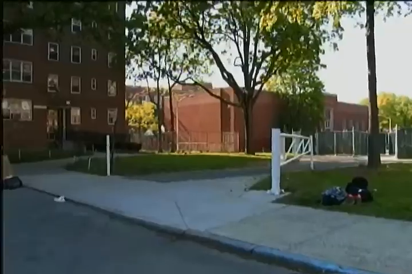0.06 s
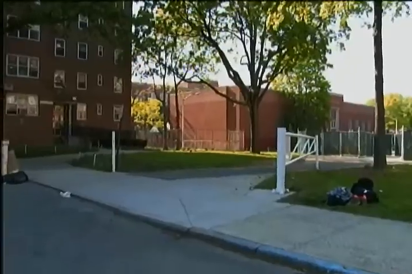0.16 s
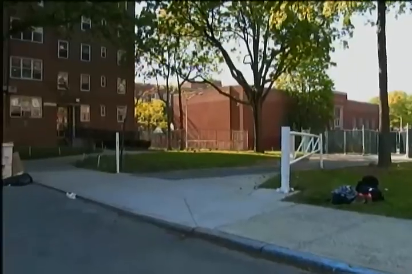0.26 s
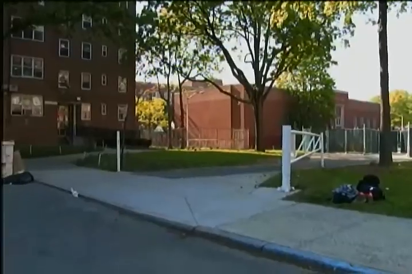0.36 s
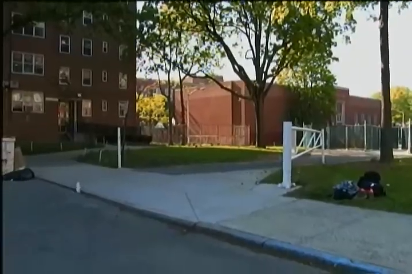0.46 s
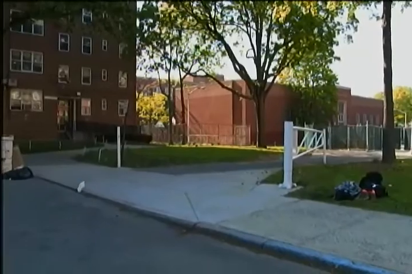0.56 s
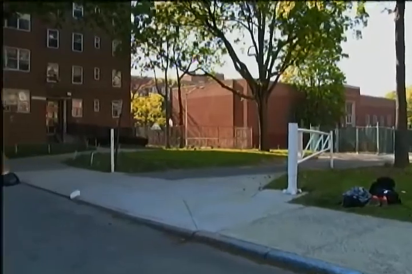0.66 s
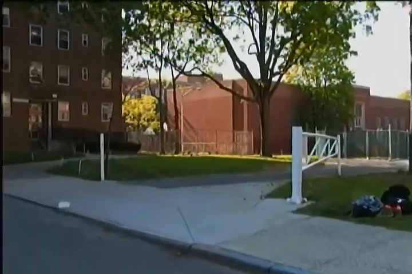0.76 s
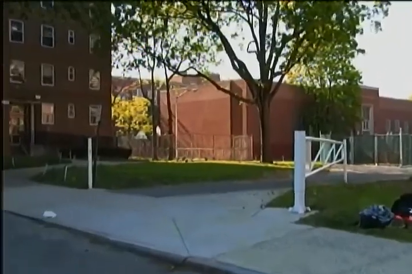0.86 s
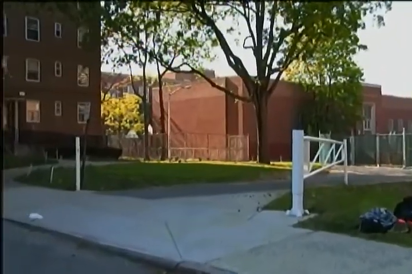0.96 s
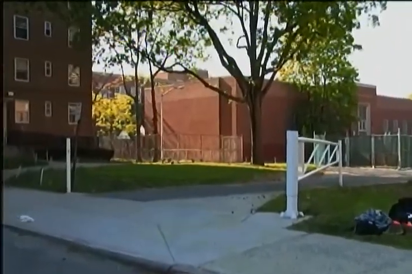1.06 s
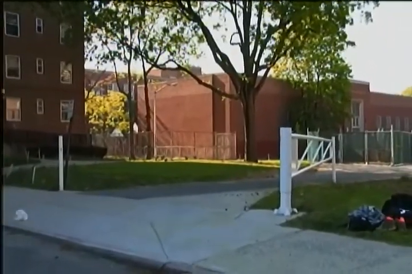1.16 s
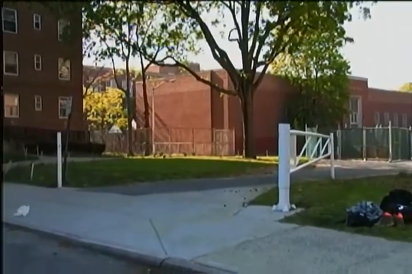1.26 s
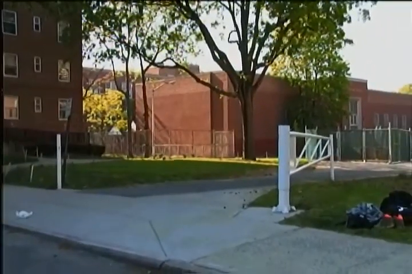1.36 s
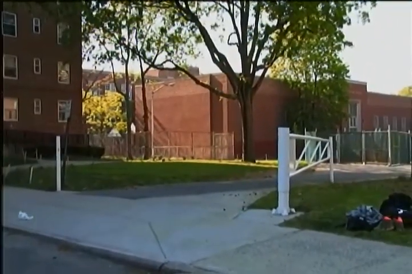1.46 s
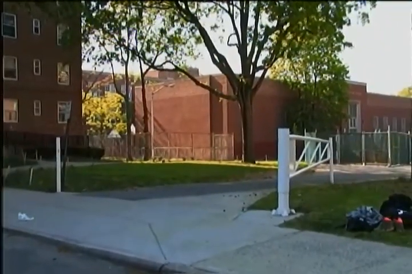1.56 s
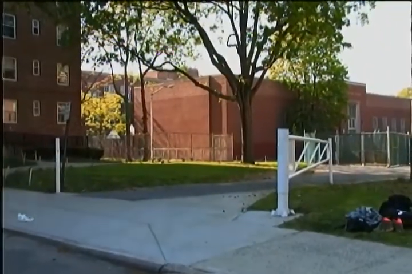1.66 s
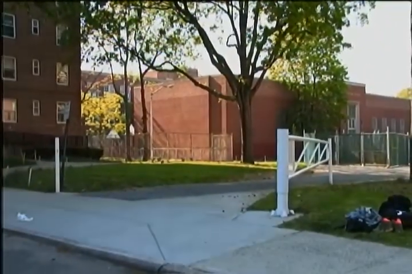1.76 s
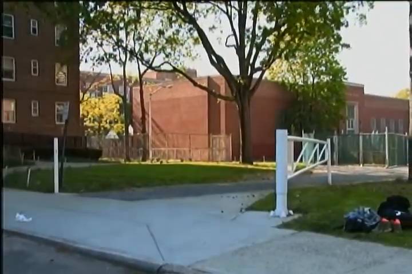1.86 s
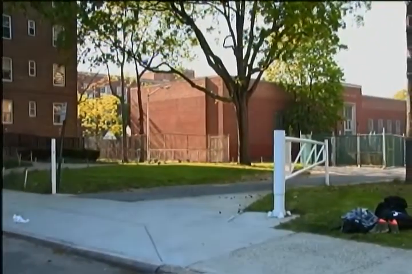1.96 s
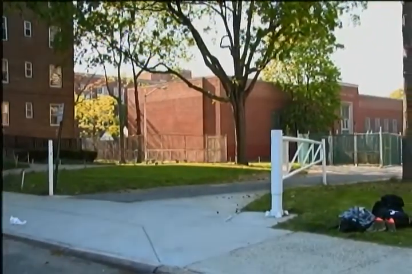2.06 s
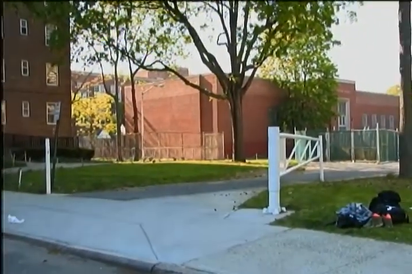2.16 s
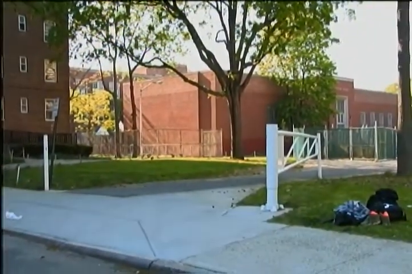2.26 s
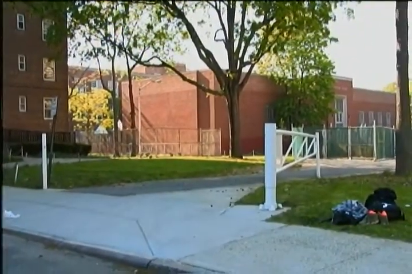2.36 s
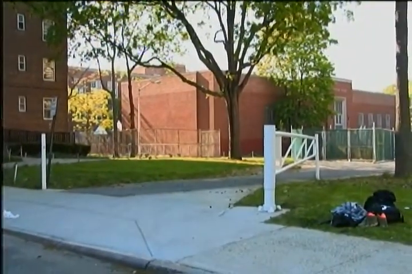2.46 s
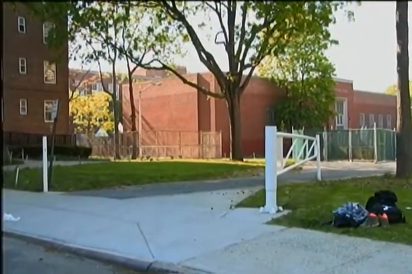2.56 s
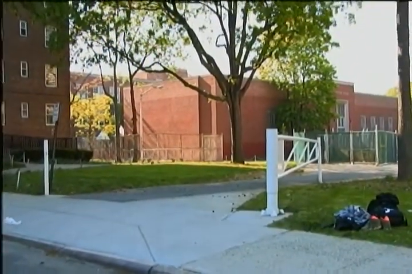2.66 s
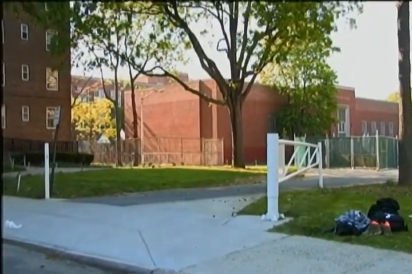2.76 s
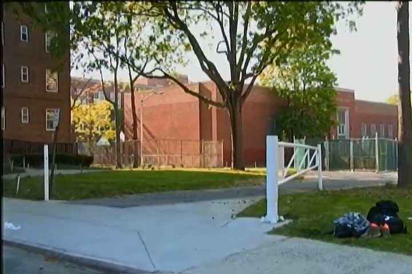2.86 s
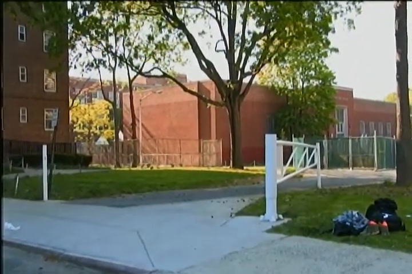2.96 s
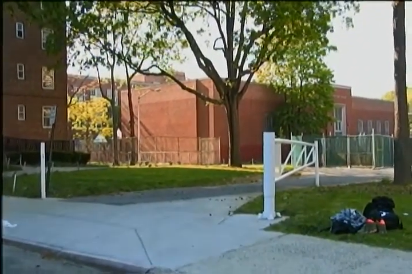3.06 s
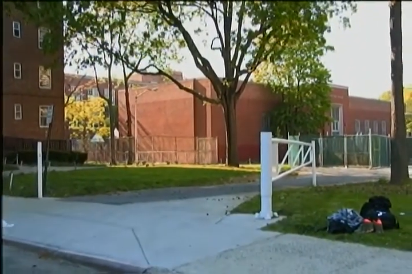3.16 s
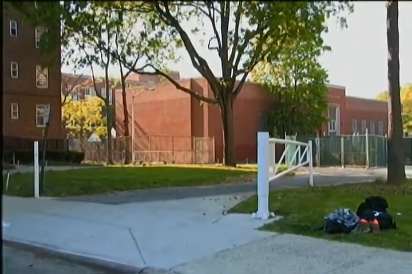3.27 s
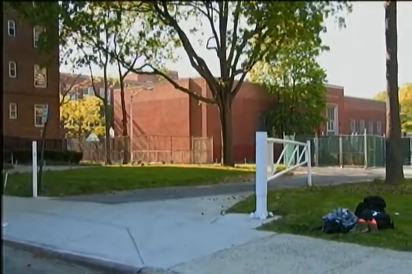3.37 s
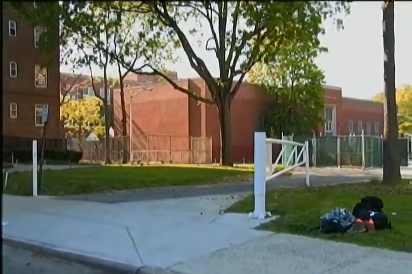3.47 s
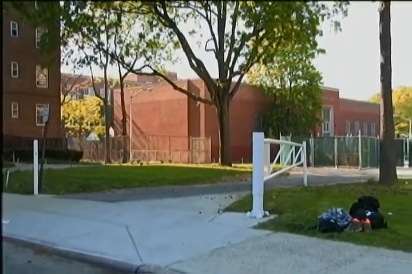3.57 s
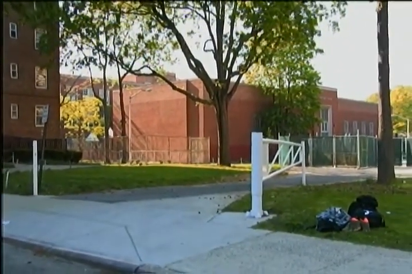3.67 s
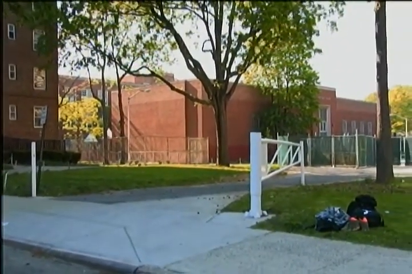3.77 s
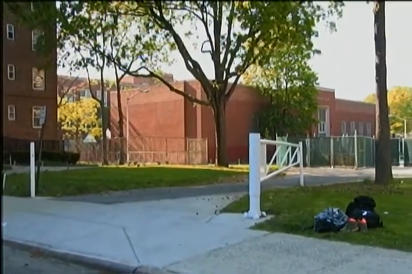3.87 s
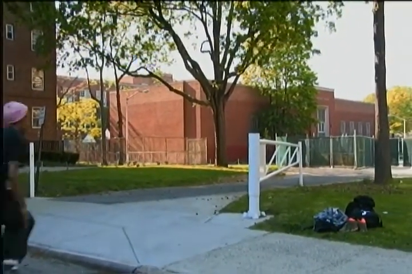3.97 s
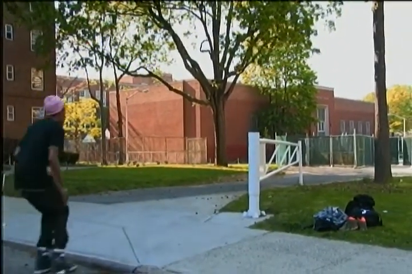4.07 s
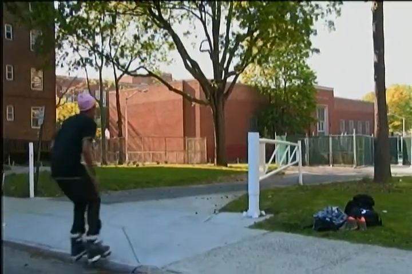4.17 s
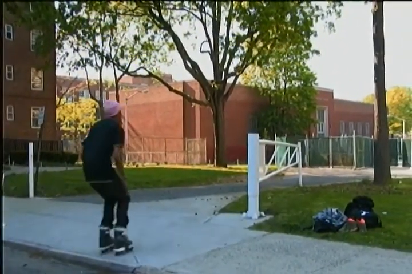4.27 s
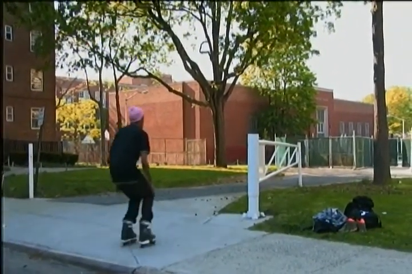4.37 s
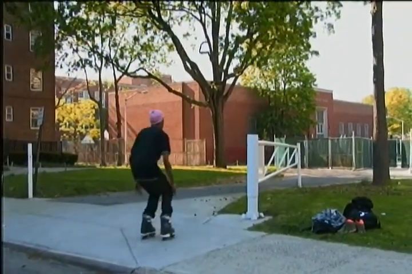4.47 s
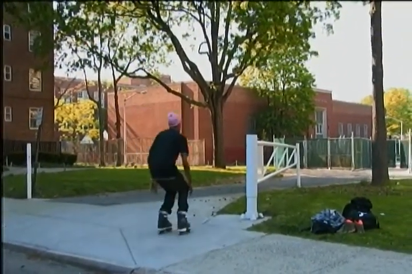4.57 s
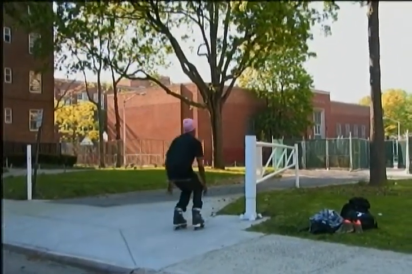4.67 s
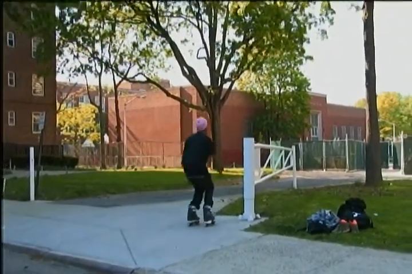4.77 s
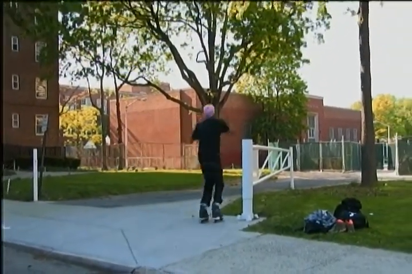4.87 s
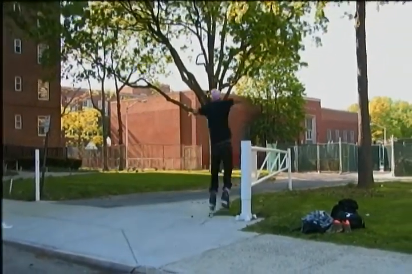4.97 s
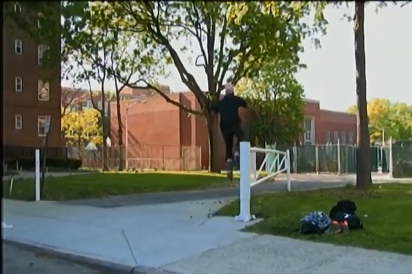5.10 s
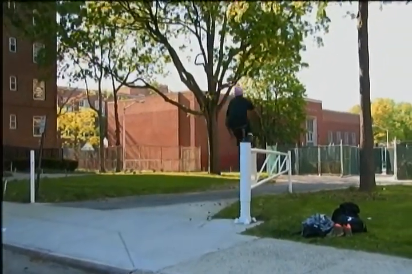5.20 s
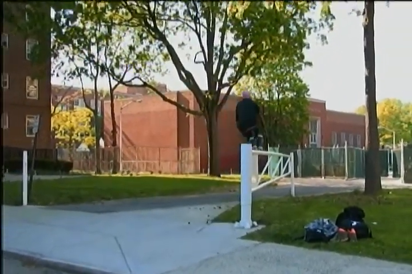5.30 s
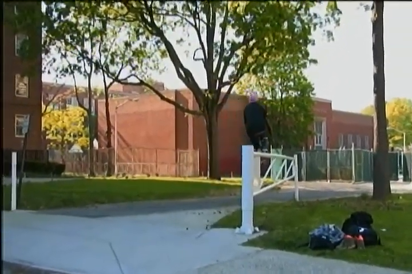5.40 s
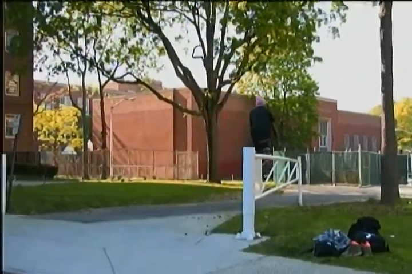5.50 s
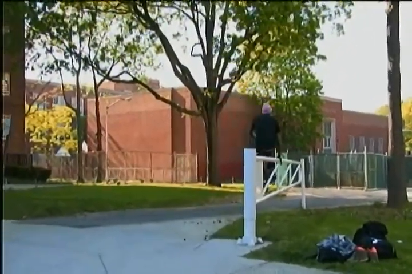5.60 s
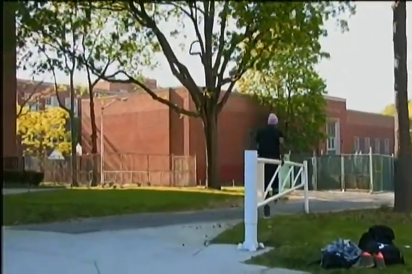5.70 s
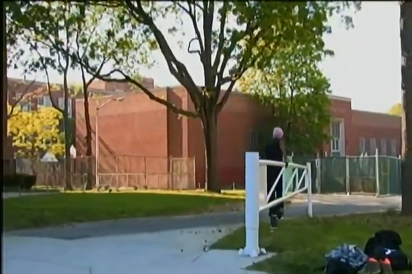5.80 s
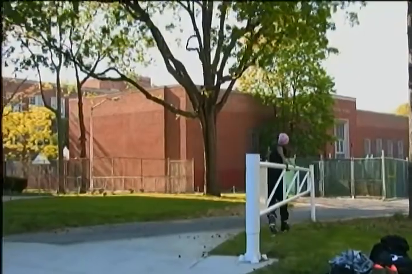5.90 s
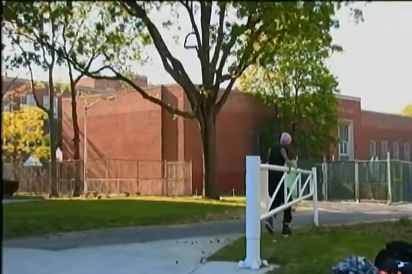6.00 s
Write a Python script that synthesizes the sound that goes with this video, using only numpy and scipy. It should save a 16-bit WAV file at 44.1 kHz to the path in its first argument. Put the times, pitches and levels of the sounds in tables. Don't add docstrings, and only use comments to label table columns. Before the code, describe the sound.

Outdoors, low distant traffic rumbles under light wind, with a gust thumping the microphone near 0.8 s. From the left, faint skate wheels clatter over stones, with sharp knocks around 0.6-1.4 s and a sparser lull until 2.2 s. Then the rolling swells quickly into a loud, coarse roar by 2.5 s, lumpy and gritty, with stones knocking and bright sand cracking, densest around 3.1-3.4 s, as it swings towards the centre. At about 4.07 s the roar cuts off: a hop onto smooth slabs, lighter rolling and crisp joint knocks from 4.2 to 4.8 s. Only tiny ticks remain through the leap around 5.0-5.2 s. At 5.24 s frames strike the steel gate, scraping and ringing hollowly; from 5.5 s the landing shakes it with clangs and another gust. The ringing settles as wheels touch down at 5.85 s and roll off, ending with a tiny high squeak at 6.03 s.

```python
import sys
import numpy as np
from scipy import signal
from scipy.fft import rfft, irfft, next_fast_len
from scipy.io import wavfile
from scipy.ndimage import map_coordinates

SR = 44100
rng = np.random.default_rng(int(sys.argv[2]) if len(sys.argv) > 2 else 0)


def gain_from_decibels(decibels):
    exponent = np.asarray(decibels, float) / 20
    return 10 ** exponent


def transcribe(u):
    v = np.clip(np.atleast_2d(u).T, -1, 1)
    q = np.round(v * 32767).astype(np.int16)
    wavfile.write(sys.argv[1], SR, q)


N = 266348
SIZE = next_fast_len(N + 8192)
TIME_S = np.arange(N) / SR


def rms_one(x):
    return x / np.sqrt(np.mean(x ** 2) + 1e-20)


def column(values):
    return np.reshape(values, (-1, 1))


def in_time(*tables):
    s, *curves = np.concatenate(tables).T
    return np.array([np.interp(TIME_S, s, curve) for curve in curves])


def at_hz(points):
    hz, value = np.transpose(points)
    grid_hz = np.maximum(np.fft.rfftfreq(SIZE, 1 / SR), 1)
    return np.interp(np.log(grid_hz), np.log(hz), value)


def bell(s, half_s):
    return np.exp(-((TIME_S - s) / half_s) ** 2)


def filtered(x, order, hz, kind):
    return signal.sosfilt(signal.butter(order, hz, kind, fs=SR, output="sos"), x)


def filtered_in_phase(x, order, hz, kind):
    return signal.sosfiltfilt(signal.butter(order, hz, kind, fs=SR, output="sos"), x)


# (frequency [Hz], width [Hz], boost [dB])
HOUSING = [(580, 166, 3), (1200, 440, 4), (2302, 320, 5), (3990, 2440, 7), (6030, 640, -3.5),
           (6690, 2200, 6), (8860, 910, 4.5), (11760, 230, -9)]


def colour(x, spectrum):
    hz = np.fft.rfftfreq(SIZE, 1 / SR)
    housing_db = sum(boost / (1 + (2 * (hz - centre) / width) ** 2) for centre, width, boost in HOUSING)
    cepstrum = irfft(np.log(gain_from_decibels(at_hz(spectrum) + housing_db)), SIZE)
    cepstrum[1:SIZE // 2] *= 2
    cepstrum[SIZE // 2 + 1:] = 0
    return irfft(rfft(x, SIZE) * np.exp(rfft(cepstrum)), SIZE)[..., :N]


def split(x, edges_hz, spectrum):
    coloured = np.broadcast_to(colour(x, spectrum), (len(edges_hz) - 1, N))
    impulse = colour(np.eye(1, N)[0], spectrum)[:8192]
    bands = []
    for k, band in enumerate(coloured):
        edges = edges_hz[k:k + 2]
        gain = np.linalg.norm(filtered(impulse, 3, edges, "band"))
        bands.append(filtered(band, 3, edges, "band") / gain)
    return np.array(bands)


def drift(rate_hz):
    r = np.exp(-40 * np.pi * rate_hz / SR)
    slow = signal.lfilter([1], [1, -2 * r, r * r], rng.standard_normal(N // 20 + 2002))[2000:]
    return np.interp(np.arange(N) / 20, np.arange(len(slow)), rms_one(slow))


def grains(per_s, spread_db):
    sizes = gain_from_decibels(spread_db * np.minimum(rng.exponential(1, N), 3.6)) * rng.choice([-1, 1], N)
    return rms_one(sizes * (rng.random(N) < per_s / SR))


# (time [s], roll level [dB], loose sand [dB])
ROLL_STREET = [(0, -104, 2), (.4, -72.5, -25), (.67, -61.5, 11), (.82, -55.5, 0), (1.13, -57, -4),
               (1.41, -63, 11), (1.61, -59.5, 7), (1.83, -63, -8), (2.22, -50, -55), (2.28, -48.5, -41),
               (2.46, -42.5, -3), (2.884, -44.5, 4), (3.128, -43.5, 7), (3.33, -40, 12), (3.562, -41.5, -2),
               (3.75, -45, 2), (3.92, -44.5, 6), (4.062, -41.5, 8)]
# (time [s], roll level [dB], loose sand [dB])
ROLL_WALK = [(4.075, -77, 22), (4.273, -68, -32), (4.395, -58, -8), (4.525, -66, 6), (4.65, -58.5, 5),
             (4.781, -60, 4.5), (4.887, -65.5, -4), (5.051, -84.5, 18), (5.23, -93, 5)]
# (time [s], roll level [dB], loose sand [dB])
ROLL_AWAY = [
    (5.85, -61.5, 6),
    (5.926, -69, 14),
    (6.04, -64.5, -5),
]
STREET_LAYERS_DB = (5.5, -1.5, -6, -23.5)
WALK_LAYERS_DB = (1.5, 0, -6, -12.5)
AWAY_LAYERS_DB = (14, 2.5, -25, -11.5)
# (time [s], roar lost [dB], half length [s])
LIFTS = [
    (2.246, 0, .015),
    (2.99, 5.5, 0.031),
    (3.638, 4.5, 0.028),
    (3.792, -1.5, 0.015),
    (3.897, 1.5, 0.026),
]


def roll_layers():
    rumble_follows, grit_takes_sand, dull_db_per_sample = 0.77, 0.062, 1.3
    level, loose = in_time(ROLL_STREET, ROLL_WALK, ROLL_AWAY)
    level = level - sum(db * bell(s, half_s) for s, db, half_s in LIFTS)
    dull = dull_db_per_sample * in_time(PATH)[1]
    rumble = rumble_follows * (level + 44.5) - 45.0
    grit = level + grit_takes_sand * loose - dull
    fine = level + loose - dull
    surface = np.searchsorted([ROLL_WALK[0][0], ROLL_WALK[-1][0]], TIME_S)
    layers_db = np.transpose([STREET_LAYERS_DB, WALK_LAYERS_DB, AWAY_LAYERS_DB])
    return [rumble, level, grit, fine] + layers_db[:, surface]


# (time [s], frequency [Hz])
GROUND = [
    (1.5, 534),
    (2.5, 478),
    (2.9, 393),
    (3.15, 320),
    (3.5, 294),
    (4.1, 225),
]


def ground_echo(x):
    dull = filtered_in_phase(x, 2, 1700, "low")
    delay = SR / 2 / in_time(GROUND)[0]
    return x - 0.37 * map_coordinates(dull, [np.arange(N) - delay], order=1)


# (frequency [Hz], density [dB/Hz])
WHEELS = [(35, -58), (60, -6.5), (286, 0), (985, -14), (1720, -13), (2230, -10.5), (2950, -23.5),
          (4090, -18), (5800, -24), (6670, -25), (10600, -21), (11900, -25), (15800, -36)]
EDGES_HZ = (50, 900, 3000, 8000, 19000)


def wheels():
    level = gain_from_decibels(roll_layers() + column([.3, 1.0, .1, .1]))
    lumps = drift(33.0)
    unsteady = [gain_from_decibels(1.26 * lumps + 0.49 * drift(66)) for _ in range(4)]
    smooth = rng.standard_normal((4, N)) * unsteady
    grit = np.array([grains(per_s, 3.4) * gain_from_decibels(2.5 * lumps) for per_s in (400, 600, 600, 350)])
    grit_share = column([.1, .35, .6, .8])
    shake = np.sqrt(1 - grit_share) * rms_one(smooth) + np.sqrt(grit_share) * rms_one(grit)
    rumble, whirr, coarse, fine = level * split(shake, EDGES_HZ, WHEELS)
    return ground_echo(rumble + whirr) + coarse + fine


# (time [s], extra above 12 kHz [dB])
GRIT_FINENESS = [
    (.5, 1.5),
    (1.1, 6),
    (2.4, 7),
    (2.75, -10),
    (3.3, -15),
    (3.45, 21),
    (3.7, 12),
    (4.0, 0),
    (4.5, -5),
]


def fine_grit(x):
    finest = filtered_in_phase(x, 4, 12000, "high")
    return x + finest * (gain_from_decibels(in_time(GRIT_FINENESS)[0]) - 1)


def air():
    hiss = filtered(rng.standard_normal((2, N)), 4, 11500, "high")
    return gain_from_decibels(roll_layers()[1] - 25) * rms_one(hiss)


# (time [s], strength [dB], weight [dB], hardness [dB])
KNOCKS_FAR = [(0.078, -42.5, 4.5, -8), (0.328, -43, 6, -13), (0.374, -42, 1, -13), (0.6366, -34.5, 8.5, -8),
              (0.6744, -27.5, -4, -13), (0.7185, -42.5, 7, -7), (0.7858, -34.5, 3.5, -16),
              (0.804, -33, -7, -27), (0.895, -39, -1, -26), (0.948, -35, 5, -13), (1.016, -47, 15, -8),
              (1.069, -29, 0.5, -9.5), (1.0846, -33, -7, -14), (1.1217, -29.5, -1, -4.5),
              (1.178, -49, -13, 2.5), (1.294, -40, -4, -27), (1.329, -36.5, 4.5, -8), (1.347, -36, -2, -17),
              (1.379, -31, 3.5, -2.5), (1.521, -41, 5.5, -7), (1.528, -40, 7, -5.5),
              (1.792, -39.5, 0.5, -10), (1.801, -41, 2, -11), (1.8222, -38.5, 5.5, -9),
              (1.8401, -35, -1, -12), (1.918, -40.5, 2, -26), (2.127, -40.5, 8, -24),
              (2.2776, -29.5, 0, -8), (2.3127, -30.5, -4, -8)]
# (time [s], strength [dB], weight [dB], sharpness [dB])
KNOCKS_NEAR = [(2.739, -39, 5, -1.5), (2.795, -34.5, -1, -17), (2.818, -31, 10, -14),
               (2.8606, -34.5, 15, -19), (2.918, -34, -10, -12), (3.061, -39.5, 23, -6),
               (3.1, -40, 17, -13), (3.186, -39, -1, 3), (3.205, -33, 7, -18), (3.257, -45, 17, 0),
               (3.284, -35, -8, -4), (3.291, -49, 25, 5), (3.309, -51, 26, -8), (3.3496, -46, 14, 3),
               (3.379, -32, 12, -29), (3.4664, -42.5, 28, 9.5), (3.671, -34, 8, -15),
               (3.6964, -31.5, 8, -26), (3.7565, -33, 10, -17), (3.834, -38, 2, -20),
               (3.8414, -32.5, 11, -29), (3.852, -39, 0, -20), (3.908, -39, 0, -15), (3.93, -42, 24.5, -17),
               (3.9543, -26, -14, -32), (3.9924, -45, 35, -12), (4.0054, -27.5, -4, -17),
               (4.0333, -26, 5, 1), (4.042, -33.5, 13, -11), (4.055, -55, 26, -10)]
# (time [s], strength [dB], weight [dB], hardness [dB])
KNOCKS_WALK = [(4.2055, -42, 0, 1), (4.2082, -29, 3.5, 0), (4.2325, -28.5, 4.5, -2),
               (4.2408, -42.5, 16.5, 4), (4.2464, -41, -2, 9), (4.2636, -33.5, -4, 3), (4.288, -56, 0, 4),
               (4.296, -58, 0, 8), (4.312, -57, 0, 3), (4.3244, -35.5, 1.5, 0), (4.333, -36.5, 5.5, -2),
               (4.3921, -31.5, -9, -0.5), (4.407, -54, 5, -9), (4.459, -44, -3, -1),
               (4.4675, -32.5, -1, -3), (4.486, -31, -3, -4), (4.498, -48.5, 16, -5),
               (4.5246, -32, 2.5, -2.5), (4.55, -30, -5.5, -2), (4.639, -48, -12, 2),
               (4.708, -31.5, 0.5, -5.5), (4.744, -47, -5, 2.5), (4.782, -26.5, -9, -5.5)]
# (time [s], strength [dB], weight [dB], hardness [dB])
STRIKES = [(5.241, -28, -1, 4), (5.257, -42, 11, 14), (5.268, -30, 2, -6), (5.335, -31, 3, -13),
           (5.354, -42, 3, 2), (5.431, -41, -6, 4), (5.501, -46, 2, 13), (5.5057, -40, 12, 16.5),
           (5.5142, -31, -1, 4), (5.525, -34, 3, 7), (5.547, -33, 2, 5), (5.564, -33, 7, -8),
           (5.7438, -30.5, 5.5, -15), (5.787, -55, 2, 12), (5.822, -46, -11, -18), (5.864, -33.5, -4, -14),
           (5.947, -40.5, 3, -20)]
# (time [s], strength [dB], weight [dB], hardness [dB])
TICKS = [
    (4.841, -60, -6, 8),
    (4.8801, -66, 2, 6),
    (4.9869, -70, -2, 9),
    (5.0394, -66, 0, 10),
    (5.0927, -75, -4, 3),
    (5.1131, -69, 0, 8),
    (5.1396, -70, -3, 8),
    (5.177, -81, 0, 6),
    (5.2024, -73, 0, 6),
]
# (frequency [Hz], density [dB/Hz])
KNOCK_COLOUR = [(41, -37), (70, 0), (261, 5.5), (1430, -15.5), (2200, -11.5), (2580, -19.5), (4340, -18),
                (5570, -25), (6830, -23), (11000, -26.5), (12500, -31), (15800, -36)]
KNOCK_DECAY_S = (.006, .0017, .0008, .0005)
SNAP_DB = (17.3, 12.5, 7.4, 1.8)


def knocks():
    tick_db, tick_follows_hardness, knock_takes_weight = -8, 1.44, 0.31
    near_parts_db = column([-9, -2, -1, 1])
    shudder_db, shudder_s = column([-20.5, -22.5, -34.5, -42]), 0.04

    s, db, weight, hard = np.transpose(KNOCKS_FAR + KNOCKS_WALK + STRIKES + TICKS)
    parts_db = [db + weight, db, db + hard, db + tick_db + tick_follows_hardness * hard]
    near_s, db, weight, sharp = np.transpose(KNOCKS_NEAR)
    near_db = np.array([db + weight, db + 4 + knock_takes_weight * weight, db, db + sharp]) + near_parts_db

    clicks = np.zeros((4, N))
    at = np.round(np.r_[s, near_s] * SR).astype(int) - 50
    clicks[:, at] = gain_from_decibels(np.c_[parts_db, near_db] + column([-5, -3, 2, 2]))

    swell = np.exp(-1 / (.0012 * SR))
    puffs = []
    for click, decay_s in zip(clicks, KNOCK_DECAY_S):
        poles = np.poly([swell, swell, np.exp(-1 / (decay_s * SR))])
        puffs.append(signal.lfilter([(1 - swell) ** 2], poles, click + 1e-18))
    poles = np.poly([swell, np.exp(-1 / (shudder_s * SR))])
    shudder = gain_from_decibels(shudder_db) * signal.lfilter([1 - swell], poles, clicks + 1e-18)
    snaps = gain_from_decibels(column(SNAP_DB)) * np.roll(clicks, shift=70, axis=1)
    noise = (puffs + shudder) * rng.choice([-1, 1], (4, N))
    return split(noise - snaps, EDGES_HZ, KNOCK_COLOUR).sum(axis=0)


# (time [s], peak [dB])
SAND = [(2.3128, -56), (2.5298, -52), (2.5707, -46), (2.5977, -52), (2.6645, -51), (2.7363, -43),
        (2.7543, -49), (2.7757, -51), (2.7952, -49), (2.8172, -45), (2.8635, -47), (2.9183, -42),
        (3.0322, -48), (3.0601, -49), (3.087, -51), (3.099, -47), (3.1414, -45), (3.1599, -40),
        (3.1858, -44), (3.205, -38), (3.2357, -46), (3.2572, -38), (3.2691, -36), (3.2906, -37),
        (3.333, -33), (3.3499, -38), (3.4632, -51), (3.4657, -44), (3.4921, -41), (3.6602, -46),
        (3.6697, -46), (3.67, -41), (3.6872, -46), (3.7246, -48), (3.7595, -47), (3.8314, -46),
        (3.8967, -51), (3.8967, -45), (3.9396, -56), (3.9396, -41), (3.992, -48), (3.992, -38),
        (4.0035, -38), (4.0319, -32),
        (3.0868, -53), (3.0993, -50), (3.1098, -50), (3.1432, -47), (3.1487, -47), (3.1601, -46),
              (3.1856, -44), (3.1926, -45), (3.204, -44), (3.236, -50), (3.24, -49), (3.2574, -39),
              (3.2694, -41), (3.2749, -42), (3.2909, -35), (3.3078, -43), (3.3328, -57), (3.3328, -39),
              (3.3497, -39), (3.4011, -45)]


def sand():
    decay_s = 0.00047
    s, db = np.transpose(SAND)
    clicks = np.zeros(N)
    clicks[np.round(s * SR).astype(int)] = gain_from_decibels(db + 6.5)
    puffs = signal.lfilter([1], [1, -np.exp(-1 / (decay_s * SR))], clicks + 1e-18)
    return filtered(puffs * rng.choice([-1, 1], N), 3, (7500, 11400), "band")


# (time [s], force [dB], bite [dB])
SLIDE = [
    (5.228, -74, -19),
    (5.232, -61, 2),
    (5.239, -28, 4.5),
    (5.276, -24.5, 1.5),
    (5.286, -29.5, 2),
    (5.348, -28.5, -1),
    (5.358, -30.5, 4),
    (5.42, -34, -0.5),
    (5.49, -32.5, -3),
]
# (time [s], force [dB], bite [dB])
LANDING = [
    (5.499, -34, -1),
    (5.509, -30, 7),
    (5.543, -33, 8),
    (5.565, -26.5, 2.5),
    (5.676, -35, 0.5),
    (5.753, -35.5, -1.5),
    (5.861, -42, -0.5),
    (5.921, -49.5, 1.5),
    (6.04, -48, -10.5),
]


def grind_layers():
    boom_lag_s = 0.086
    force, bite = in_time(SLIDE, LANDING)
    keep = np.exp(-1 / (boom_lag_s * SR))
    boom = gain_from_decibels(-5) * np.sqrt(signal.lfilter([1 - keep], [1, -keep], gain_from_decibels(2 * force)))
    return np.array([boom, gain_from_decibels(force), gain_from_decibels(force - 9 + bite), gain_from_decibels(force - 23.5 + 2.4 * bite)])


# (frequency [Hz], width [Hz], level [dB])
GATE = [(197, 20, -1.5), (420, 9.9, -21.5), (534, 4.2, -11), (637, 14, -11), (642, 51, -2.5),
        (598, 4.6, -10), (719, 11, -5), (796, 5.4, -7), (940, 9, -15), (282.4, 21, -6.5), (868, 4.5, -15),
        (1027, 9.2, -16), (1073, 4.3, -7.5), (1213, 71, -7.5), (1586, 23, -17), (1680, 20, -19),
        (3550, 20, -9), (4300, 25, -24), (4745, 12, -23), (6436, 12, -28)]
# (frequency [Hz], density [dB/Hz])
GRIND_COLOUR = [(47, -59), (80, -12.5), (145, -20), (212, -5), (376, -15.5), (640, -11), (911, -10),
                (1210, -9.5), (1360, -18.5), (1620, -11), (1930, -19.5), (4900, -27.5), (5700, -35),
                (6700, -29), (7900, -38), (8890, -34), (15800, -46.5)]
GATE_EDGES_HZ = (50, 450, 2000, 8000, 19000)


def gate():
    start = round(SLIDE[0][0] * SR)
    chatter = 0.39 * grains(2500, 2.4) + 0.65 * rng.standard_normal(N)
    rung = np.zeros(N)
    for hz, width_hz, db in GATE:
        r, angle = np.exp(-np.pi * width_hz / SR), 2 * np.pi * hz / SR
        drive = rng.standard_normal(N - start) * gain_from_decibels(db + 2.0 * drift(8.6)[start:])
        gain = np.sqrt(1 - r * r) * np.sin(angle)
        rung[start:] += signal.lfilter([gain], [1, -2 * r * np.cos(angle), r * r], drive)
    scrape = split(chatter * gain_from_decibels(2.0 * drift(21)), GATE_EDGES_HZ, GRIND_COLOUR)
    tube = split(rung, GATE_EDGES_HZ, [(50, 0), (16000, 0)])
    both = scrape * gain_from_decibels(column([-4, -4.5, -1, -1.5])) + tube * gain_from_decibels(column([-19, -18, -30, -60]))
    level = grind_layers() * (np.arange(N) >= start)
    return (level * both).sum(axis=0)


# (time [s], frequency [Hz], level [dB], t60 [s])
CLANGS = [(1.071, 1400, -38, 0.048), (3.987, 1200, -25.5, 0.052), (4.243, 207, -23, 0.067),
          (5.245, 529, -33.5, 1.3), (5.245, 802, -40, 2.1), (5.250, 1229, -28, 0.23),
          (5.255, 1556, -28, 0.23), (5.27, 868, -36, 0.61), (5.275, 690, -19, 0.037),
          (5.272, 700, -32, 0.32), (5.33, 590, -40, 0.2), (5.454, 1100, -32, 0.16), (5.49, 640, -41, 0.14),
          (5.35, 197, -36, .2), (5.44, 190, -33, 0.47), (5.30, 1100, -35, 0.44), (5.55, 1900, -41, .08),
          (5.503, 1213, -22.5, 0.15), (5.518, 1614, -24, 0.07), (5.552, 650, -30, 0.08),
          (5.572, 645, -23, 0.2), (5.592, 1650, -32, .04), (5.55, 220, -32, 0.47), (5.72, 215, -32, 0.28),
          (4.267, 2250, -37, 0.036), (4.37, 2230, -42, 0.057), (5.334, 720, -21, .04),
          (5.455, 193, -31, 0.093), (5.56, 598, -35.5, 1.05), (5.58, 1680, -39, 0.42),
          (5.68, 282, -37.5, 0.6), (5.592, 214.5, -26.5, 0.43), (5.561, 1180, -27.5, 0.2),
          (5.768, 1100, -32.5, 0.071), (5.859, 112, -34, 0.15), (5.946, 1110, -32, 0.034)]
# (time [s], peak [dB], frequency [Hz])
FRAME_RINGS = [(0.6374, -45, 1140), (0.6749, -30, 1244), (0.9477, -36, 1190), (1.07, -30, 2200),
               (1.0834, -28, 1190), (1.3299, -41, 1140), (1.3793, -30.5, 1230), (1.7918, -39, 1200),
               (1.8392, -36, 1350), (2.2782, -27, 2120), (2.8174, -26, 1110), (2.9193, -36, 1150),
               (3.0614, -32, 2200), (3.2066, -20, 2270), (3.6716, -20, 2170), (3.8422, -32, 2220),
               (4.0327, -23, 2200), (4.0554, -23, 2230), (4.2095, -26, 1147), (4.2318, -28, 1200),
               (4.2464, -32, 3360), (4.2632, -31, 1030), (4.3255, -28, 1110), (4.3334, -41, 2130),
               (4.3935, -33, 2010), (4.4672, -34, 2080), (4.4867, -27, 2130), (4.5251, -28, 1116),
               (4.5506, -26.5, 2100), (4.7093, -31.5, 1145), (4.7835, -28, 1580), (5.239, -23, 1200),
               (5.4294, -32, 1100), (5.9464, -32, 1060)]


def clangs():
    frame_db, frame_t60_s = -2.5, 0.026
    frame = [(s - .001, hz, db + frame_db, frame_t60_s) for s, db, hz in FRAME_RINGS]
    out = np.zeros(N)
    for s, hz, db, t60 in CLANGS + frame:
        t = np.arange(round(min(t60, 1) * SR)) / SR
        modes = np.sin(2 * np.pi * hz * t) + 0.083 * np.sin(2 * np.pi * hz * 0.85 * t)
        ring = gain_from_decibels(db - 60 * t / t60) * (1 - np.exp(-t / 0.0014)) * modes
        i = round(s * SR)
        out[i:i + len(t)] += ring[:N - i]
    return out


# (time [s], frequency [Hz], half width [Hz], half length [s], level [dB])
SQUEAK = (6.027, 15000, 800, .009, -62)


def squeak():
    s, hz, width_hz, half_s, db = SQUEAK
    noise = filtered(rng.standard_normal(N), 2, [hz - width_hz, hz + width_hz], "band")
    return gain_from_decibels(db) * bell(s, half_s) * rms_one(noise)


# (time [s], left minus right [dB], left lead [samples])
PATH = [
    (0, 7, 5),
    (.6, 4.5, 4.87),
    (2.3, 6.5, 4.2),
    (2.9, 6.5, 4.1),
    (3.25, 6, 2.19),
    (3.9, 2.5, 0.84),
    (4.3, 0, 0.09),
    (5.2, 0, 0.18),
    (6.04, 2.5, 0.16),
]


def placed(x):
    pan_db, lead = in_time(PATH)
    middle = filtered_in_phase(x, 1, [350, 5000], "band")
    left = x + middle * (gain_from_decibels(pan_db / 2) - 1)
    right = x + middle * (gain_from_decibels(-pan_db / 2) - 1)
    treble = filtered_in_phase(right, 1, 1500, "high")
    sway = 0.3 * drift(31)
    late = map_coordinates(treble, [np.arange(N) - np.maximum(lead, 0) - sway], order=3)
    return np.array([left, right - treble + late])


# (frequency [Hz], likeness [0-1])
LIKENESS = [(60, 1), (220, 1), (450, 0.86), (1000, 0.47), (2000, 0.6), (4500, 0.091), (9000, 0.81),
            (15000, .02)]


def diffuse(pair):
    alike = np.clip(at_hz(LIKENESS), 0, 1)
    middle = np.sqrt((1 + alike) / 2) * pair[0]
    side = np.sqrt((1 - alike) / 2) * pair[1]
    return irfft(middle + side * [[1], [-1]], SIZE)[:, :N]


# (frequency [Hz], level [dB])
YARD = [(100, -15.5), (500, -9), (1000, -10), (3000, -17), (6000, -19), (15000, -18)]


def echoes(x):
    t60_s, rise_s = .07, 0.0037
    t, hop = np.arange(SR // 10) / SR, SR // 8
    washes = rng.standard_normal((2, 5, len(t))) * gain_from_decibels(-60 * t / t60_s) * (1 - np.exp(-t / rise_s))
    washes = washes / np.linalg.norm(washes[0, 0])
    padded = np.pad(x, (hop, 2 * hop))
    fade = np.hanning(2 * hop) ** .75
    out = np.zeros((2, N + SR))
    for k, i in enumerate(range(0, N + hop, hop)):
        piece = fade * padded[None, i:i + 2 * hop]
        wet = signal.fftconvolve(piece, washes[:, k * 2 % 5], axes=1)
        out[:, i:i + wet.shape[1]] += wet
    return diffuse(rfft(out[:, hop:hop + N], SIZE) * gain_from_decibels(at_hz(YARD)))


# (frequency [Hz], density [dB/Hz])
STREET = [(15, -31), (25, -5.5), (76, 5), (291, 1), (352, -7), (604, -7), (2030, -21), (8730, -45),
          (12500, -43), (15800, -58)]


def street():
    noise = colour(rng.standard_normal((2, N)), STREET)
    swell = gain_from_decibels(.8 * drift(1.5))
    return gain_from_decibels(-53) * swell * rms_one(diffuse(rfft(noise, SIZE)))


# (time [s], level [dB])
GUSTS = [
    (0.771, -28.5),
    (1.09, -38),
    (2.3, -42),
    (2.72, -42),
    (3.4, -59),
    (3.72, -38),
    (4.23, -40),
    (5.248, -58),
    (5.54, -34),
    (5.9, -50),
]


def wind():
    calm_db, rise_s, fall_s, side_db = -83, 0.01, 0.18, -30
    level = gain_from_decibels(calm_db)
    for s, db in GUSTS:
        age = np.where(TIME_S < s, (s - TIME_S) / rise_s, (TIME_S - s) / fall_s)
        level = level + gain_from_decibels(db) * np.exp(-age)
    side = gain_from_decibels(side_db) * rng.standard_normal(N) * [[1], [-1]]
    pressure = filtered(rng.standard_normal(N) + side, 2, [32, 85], "band")
    return gain_from_decibels(-15.5) * level * rms_one(pressure)


def whine():
    hz, width_hz = 15700, 25
    return gain_from_decibels(-95) * rms_one(filtered(rng.standard_normal(N), 2, [hz - width_hz, hz + width_hz], "band"))


def scene():
    skater = fine_grit(wheels()) + knocks() + sand() + gate() + clangs() + squeak()
    return placed(skater) + echoes(skater) + air() + street() + wind() + whine()


def band_limit(x):
    return signal.sosfilt(signal.butter(12, 15950, fs=SR, output="sos"), x)


def record(dry):
    hiss = gain_from_decibels(-97) * rng.standard_normal((2, N))
    top_cut = signal.cheby2(24, 60, 15950, fs=SR, output="sos")
    return band_limit(signal.sosfilt(top_cut, dry + hiss))


dry = scene()
out = record(dry)
transcribe(out)
```